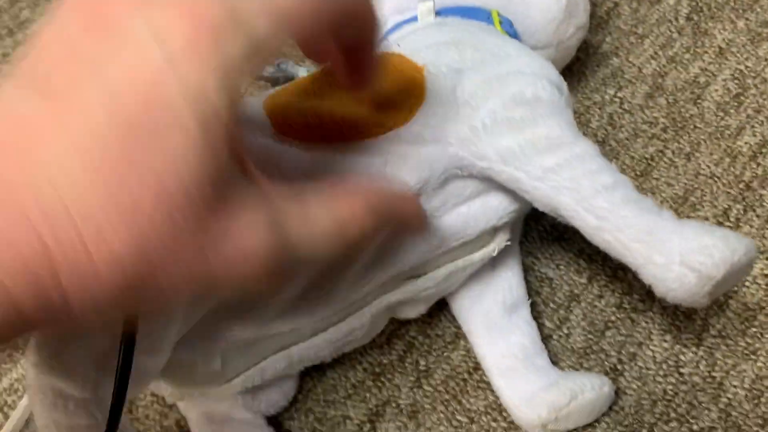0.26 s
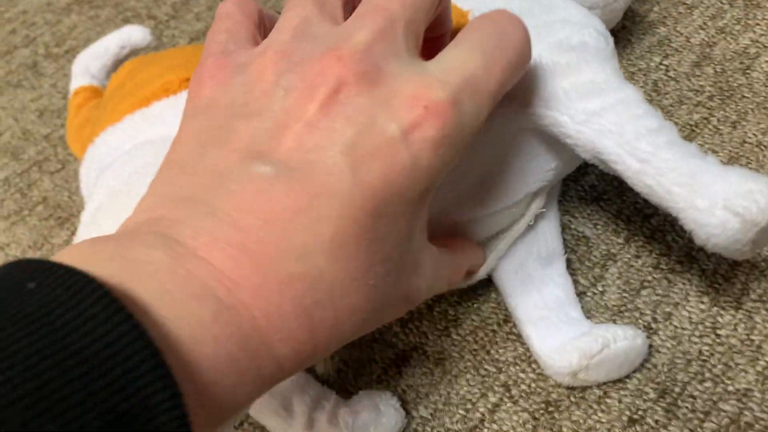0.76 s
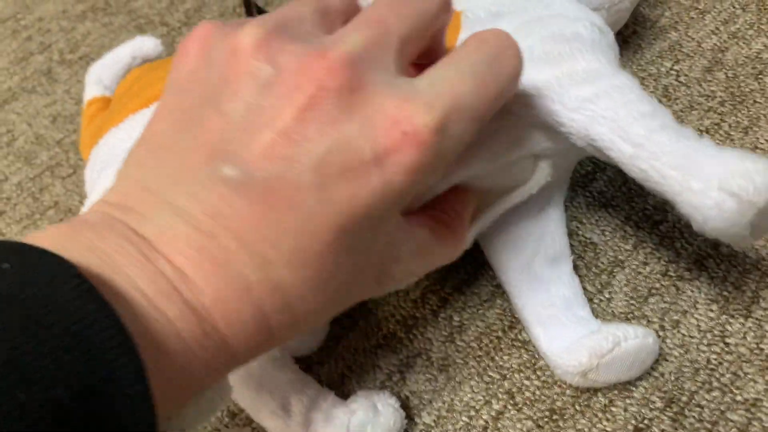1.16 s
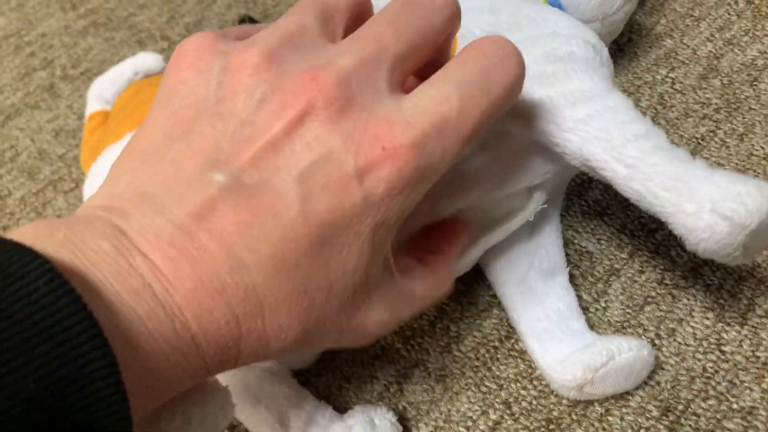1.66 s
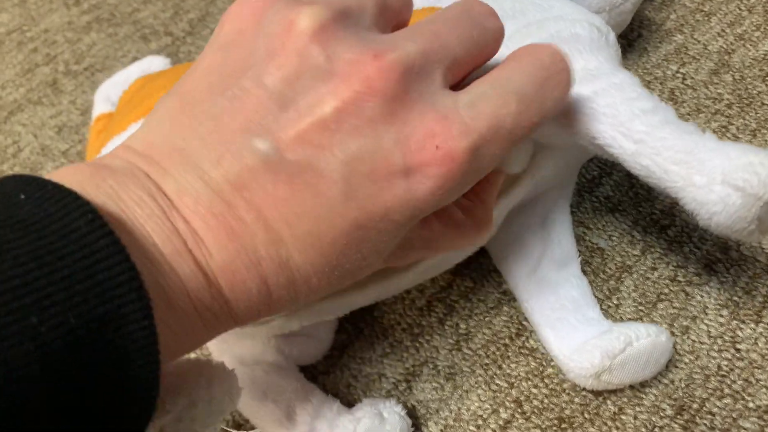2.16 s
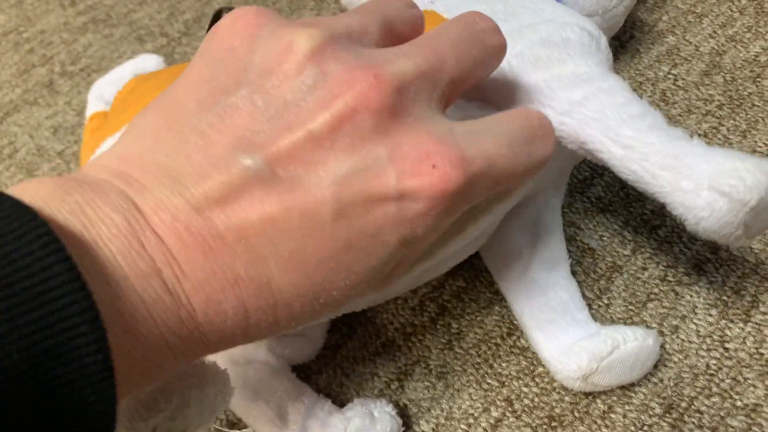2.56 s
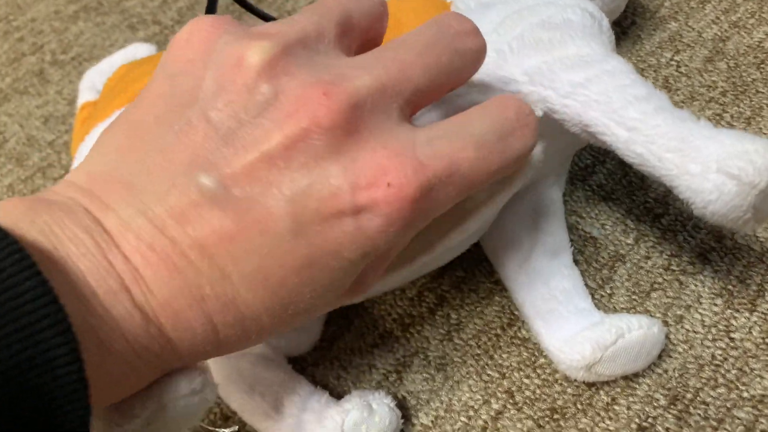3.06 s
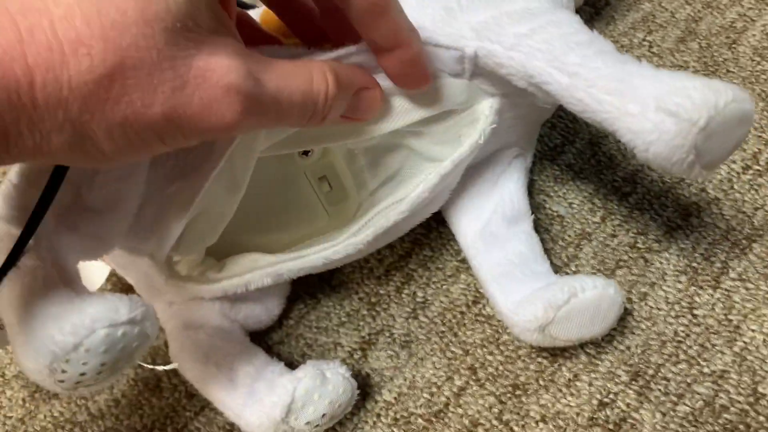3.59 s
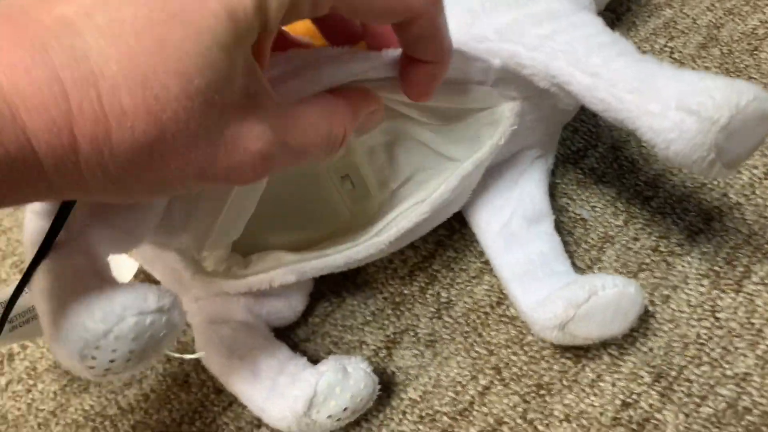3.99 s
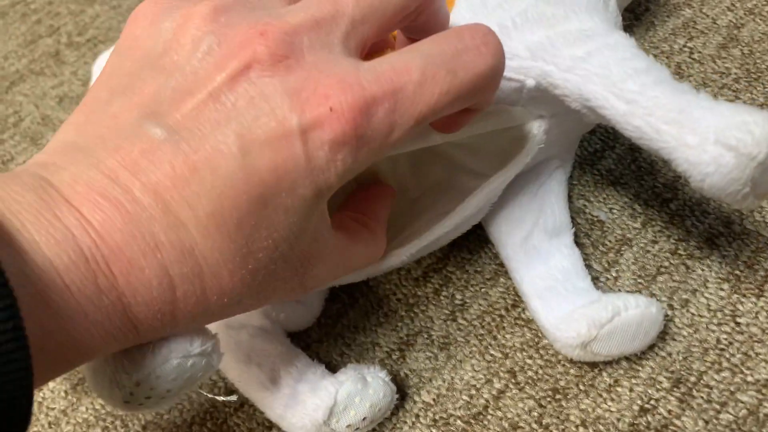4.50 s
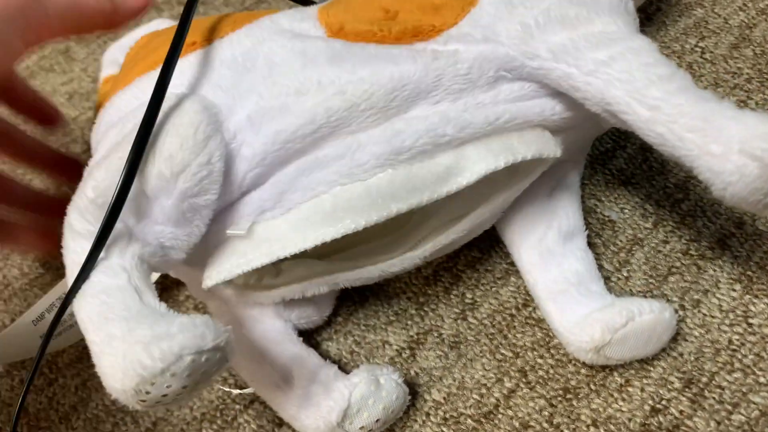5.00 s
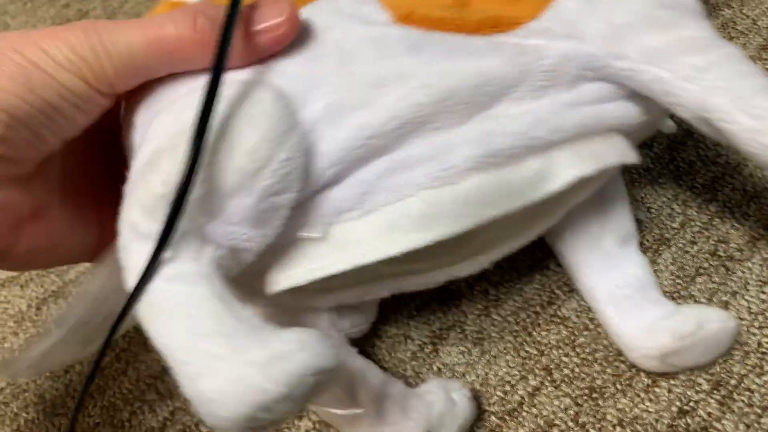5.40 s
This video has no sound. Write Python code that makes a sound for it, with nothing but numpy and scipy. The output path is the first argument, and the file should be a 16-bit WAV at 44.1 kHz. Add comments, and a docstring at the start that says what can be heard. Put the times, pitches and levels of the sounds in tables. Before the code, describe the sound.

Close, dry tearing of a fabric fastener in two pulls, the second weaker and more broken, followed by quiet plush brushing and faint clicks indoors.

```python
"""First a low rumble with a faint hum and soft brushing, then a hook-and-loop strip rips open in two short pulls.
The strip is on a plush toy in a carpeted room; hooks snap as short noise bursts that ring the tape (damped
modes) and thud the stuffing, small hooks crackle; tearing loops and late soft scuffs are trains of random breaks.
Fingers brush the plush and the toy slides on the carpet as shaped noise; stiff tape squeaks as wandering sines.
Late soft ticks come from handling. A short diffuse tail follows hooks and tears; two ports hear it all."""
import sys
import numpy as np
from scipy import signal
from scipy.fft import rfft, irfft, next_fast_len
from scipy.io import wavfile
from scipy.ndimage import uniform_filter1d

SR = 44100
rng = np.random.default_rng(int(sys.argv[2]) if len(sys.argv) > 2 else 0)


def file_out(sig):
    """Save sig as 16-bit WAV at sys.argv[1]."""
    # one column per channel
    cols = np.atleast_2d(sig).T
    # limit, then scale
    lim = np.clip(cols, -1, 1)
    pcm = np.round(lim * 32767).astype(np.int16)
    wavfile.write(sys.argv[1], SR, pcm)


N = 249165  # length [samples]


def gain_of(db):
    """Level law: decibels to an amplitude factor."""
    return 10 ** (np.asarray(db) / 20)


def evened(x):
    """Power normalisation: scales to rms 1."""
    return x / np.sqrt(np.mean(x ** 2) + 1e-20)


def read(points, hz):
    """Logarithmic pitch axis: interpolates a curve over log frequency."""
    f, value = np.transpose(points)
    return np.interp(np.log(hz + 1), np.log(f + 1), value)


def causal(points, size=1024):
    """Minimum phase: the impulse that packs a spectrum's energy earliest, peak 1."""
    level_db = read(points, abs(np.fft.fftfreq(size, 1 / SR)))
    log_gain = np.log(gain_of(np.maximum(level_db, -100)))
    spectrum = np.exp(np.conj(signal.hilbert(log_gain)))
    taps = np.fft.ifft(spectrum).real[:size // 2]
    return taps / abs(taps).max()


def ring(modes, detune):
    """Modal decay: a sum of sines, each dying at a rate set by its bandwidth, peak 1."""
    t = np.arange(800) / SR
    out = 0
    for (hz, width_hz, db), shift in zip(modes, detune):
        decay = np.exp(-np.pi * width_hz * t)
        out = out + gain_of(db) * decay * np.sin(2 * np.pi * hz * shift * t)
    out *= 1 - np.exp(-t / .00015)  # each ring swells in over a fraction of a millisecond
    return out / abs(out).max()


def held(start, rise, hold, t60):
    """Exponential release: linear rise, hold, then decay by 60 dB per t60; times in s."""
    t = np.arange(N) / SR - start
    return np.clip(t / rise, 0, 1) * gain_of(-60 * np.maximum(t - rise - hold, 0) / t60)


# likeness of the noise at the two ports: (frequency [Hz], coherence [0 to 1])
PORT_COHERENCE = [(100, 0.98), (500, 0.62), (1500, 0.067), (4000, 0.087), (6000, 0.077), (7000, 1),
                  (16000, 0.85)]


def port_noise(points, grain):
    """Partial coherence: coloured noise at two ports sharing an envelope, rms 1 over both."""
    size = next_fast_len(N)
    hz = np.fft.rfftfreq(size, 1 / SR)
    first, other = rfft(rng.standard_normal((2, N)) * grain, size)
    same = np.clip(read(PORT_COHERENCE, hz), 0, 1)
    second = same * first + np.sqrt(1 - same ** 2) * other
    coloured = np.array([first, second]) * gain_of(read(points, hz))
    return evened(irfft(coloured, size)[:, :N])


# relative spectrum of the low rumble: (frequency [Hz], level [dB])
RUMBLE_SPECTRUM = [(12, -58), (25, -36.5), (34, -19.5), (50, -6), (58, -5), (66, 7), (76, -6), (100, -7),
                   (140, -10), (200, -25), (476, -37), (900, -47.5), (1200, -63), (2000, -120)]
# level of the rumble, rising and falling: (time [s], level [dB])
RUMBLE_LEVEL = [(0.0, -57), (0.93, -50.5), (0.96, -59), (2.01, -57), (2.11, -46.5), (2.2, -64),
                (2.26, -46.5), (2.42, -60.5), (3.07, -54), (3.16, -59.5), (3.78, -55.5), (3.96, -62),
                (4.04, -52), (4.11, -57.5), (5.6, -54.5), (5.65, -47.5)]
# relative spectrum of the steady hiss: (frequency [Hz], level [dB])
HISS_SPECTRUM = [(600, -23), (1200, 4.5), (4000, -1.5), (9000, -3.5), (15500, -4), (16000, -40.5)]
HISS_DB = -83.5
# faint hum lines: (frequency [Hz], rms level [dB])
HUM_LINES = [(360, -88), (479, -88), (598, -79)]


def room_tone(waver=0.013):
    """Noise floor: narrow-band rumble of wandering level, steady hiss and frequency-modulated hum lines."""
    t = np.arange(N) / SR
    rumble_gain = gain_of(np.interp(t, *np.transpose(RUMBLE_LEVEL)))
    out = rumble_gain * port_noise(RUMBLE_SPECTRUM, 1)
    out += gain_of(HISS_DB) * port_noise(HISS_SPECTRUM, 1)
    for hz, db in HUM_LINES:
        drift = 1 + waver * evened(uniform_filter1d(rng.standard_normal(N), 3000))
        phase = 2 * np.pi * np.cumsum(hz * drift) / SR
        out = out + gain_of(db) * np.sqrt(2) * np.sin(phase)
    return out


# relative spectrum of the toy's flank on the carpet: (frequency [Hz], level [dB])
DRAG_SPECTRUM = [(150, -40.5), (250, -13.5), (443, -9), (649, -2), (1360, -23.5), (1640, -14), (2240, -6),
                 (3290, -17.5), (4440, -12), (4820, -26), (6500, -29), (8450, -60), (14300, -120)]
# slides of the toy: (start [s], hold [s], level [dB])
SLIDES = [(5.079, 0.072, -59), (5.22, 0.084, -77.5)]
SLIDE_RISE_S, SLIDE_T60_S = 0.05, 0.36


def sliding(grain_db=2.0):
    """Friction noise: rough hiss with the hollow colour of the stuffed body."""
    grain = gain_of(grain_db * evened(uniform_filter1d(rng.standard_normal(N), 150)))
    hiss = port_noise(DRAG_SPECTRUM, grain)
    level = sum(gain_of(db) * held(s, SLIDE_RISE_S, hold, SLIDE_T60_S) for s, hold, db in SLIDES)
    return hiss * level


# relative spectra of the three brushing bands: (frequency [Hz], level [dB])
FIZZ_SPECTRUM = [(5000, -30), (6500, -6), (8700, 0), (10500, -5), (12500, -8), (15700, -11), (16000, -45)]
SWISH_SPECTRUM = [(1200, -12.5), (1900, -7), (2700, -2), (3600, -7), (4400, -3.5), (5300, -10.5),
                  (6200, -14), (7000, -39.5)]
PRESS_SPECTRUM = [(150, -22), (280, -4.5), (600, -3.5), (1200, -10.5), (2000, -19.5)]
# finger strokes, levels before the band trims of fingers():
# (peak time [s], rise [s], fall [s], fizz [dB], swish [dB], press [dB])
STROKES = [(0.1, .1, 0.35, -77.5, -82, -80), (0.46, 0.13, 0.13, -71.5, -72.5, -71),
           (0.645, 0.029, 0.24, -56, -63, -80), (0.72, 0.14, 0.5, -59.5, -72, -65.5),
           (0.795, 0.052, 0.097, -58, -45.5, -68), (0.881, 0.069, .07, -73, -51.5, -76),
           (0.93, 0.079, 0.066, -59, -84, -66), (1.1, 0.3, 0.054, -60, -62, -63.5),
           (1.15, 0.078, 0.084, -54.5, -58, -80), (1.26, 0.048, 0.11, -66.5, -57.5, -51.5),
           (1.62, 0.28, 0.059, -73.5, -80.5, -87), (1.72, 0.045, 0.089, -66, -66, -76),
           (1.88, 0.16, 0.12, -55.5, -70, -92), (2.04, 0.15, 0.29, -58.5, -61, -65),
           (2.244, 0.02, 0.054, -46, -48.5, -80.5), (2.46, 0.22, 0.074, -74.5, -78.5, -79),
           (2.645, .08, 0.075, -64.5, -71, -64), (2.9, 0.085, 0.37, -70, -76, -76),
           (3.19, 0.13, 0.23, -75.5, -80, -77), (3.43, 0.1, 0.076, -68, -65, -71),
           (3.82, 0.14, 0.1, -60, -67, -64.5), (3.86, 0.066, 0.04, -62, -72, -78),
           (4.009, 0.11, 0.12, -79, -71.5, -76.5), (4.21, .1, 0.052, -84, -75, -75.5),
           (4.41, 0.046, 0.061, -58, -64.5, -59.5), (4.65, 0.023, 0.059, -61.5, -71.5, -83.5),
           (4.69, 0.046, .04, -54.5, -62, -65), (4.74, 0.052, 0.029, -59.5, -62, -79.5),
           (5.16, 0.07, 0.096, -82, -67.5, -56.5), (5.279, .1, 0.13, -66, -64.5, -75.5),
           (5.391, 0.26, 0.14, -63.5, -67.5, -65.5), (5.499, 0.1, 0.076, -61, -61, -60.5),
           (5.64, 0.26, 0.085, -68, -67, -68)]
FADE_DB = -20.5  # change of level over one rise or fall time away from the peak
RESTING_DB = (-90, -96, -82.5)  # the hand lying still, before the trims: fizz, swish, press


def brushing(t):
    """Energy summation: band gains from strokes that swell to a peak and fade, added as powers."""
    power = gain_of(RESTING_DB)[:, None] ** 2 * np.ones(len(t))
    for s, rise, fall, *levels_db in STROKES:
        away = np.where(t < s, (s - t) / max(rise, .01), (t - s) / max(fall, .01))
        power = power + (gain_of(levels_db)[:, None] * gain_of(FADE_DB * away)) ** 2
    return np.sqrt(power)


def fingers(patchy_db=2.0, fibre_db=-0.5, colour_db=3.5, fizz_db=-1.5, swish_db=-1.0, press_db=-0.5):
    """Friction on pile: skin sliding gives three bands of uneven hiss whose colour wanders."""
    grain = gain_of(patchy_db * evened(uniform_filter1d(rng.standard_normal(N), 400)))
    flicks = uniform_filter1d(rng.exponential(1, N) ** 2, 40) - 2
    grain *= gain_of(fibre_db * evened(flicks))  # negative: each burst of fibre flicks dips the level
    t, steps = np.arange(N) / SR, np.arange(0, N, 64) / SR
    spectra = (FIZZ_SPECTRUM, SWISH_SPECTRUM, PRESS_SPECTRUM)
    hiss = 0
    for spectrum, gain, trim_db in zip(spectra, brushing(steps), (fizz_db, swish_db, press_db)):
        hiss = hiss + np.interp(t, steps, gain) * gain_of(trim_db) * port_noise(spectrum, grain)
    z = signal.stft(hiss, nperseg=256)[2]
    patches = rng.standard_normal(z.shape[1:])
    patches = uniform_filter1d(uniform_filter1d(patches, 4, 0), 24, 1)  # smooth over pitch, then time
    return signal.istft(z * gain_of(colour_db * evened(patches)), nperseg=256)[1][:, :N]


# faint squeaks of stiff tape, level before the envelope:
# (start [s], hold [s], frequency [Hz], bandwidth of each of two equal poles [Hz], level [dB])
SQUEAKS = [(0.92, 0.17, 2860, 130, -74), (4.204, .012, 3090, 120.7, -72), (4.204, .008, 1024, 200, -65.5),
           (4.407, .008, 4820, 403, -44.5)]
SQUEAK_T60_S = .04


def squeaks():
    """Narrow-band noise: rubbing tape as a sine whose size and phase wander as its bandwidth allows."""
    out, t = np.zeros(N), np.arange(N) / SR
    for s, hold, hz, width, db in SQUEAKS:
        r = np.exp(-np.pi * width / SR)
        noise = rng.standard_normal(N) + 1j * rng.standard_normal(N)
        wander = signal.lfilter([1], [1, -2 * r, r * r], noise)
        tone = evened((wander * np.exp(2j * np.pi * hz * t)).real)
        out += gain_of(db) * held(s, 0.0014, hold, SQUEAK_T60_S) * tone
    return out


# relative spectrum of one snap, for tears and hooks: (frequency [Hz], level [dB])
SNAP_SPECTRUM = [(800, -52.5), (2000, -38), (4000, -23.5), (6000, -6), (8500, 5), (11000, 0.5), (15000, 2),
                 (16000, -7.5), (17000, -27)]
# modes of the stiff tape, for tears and hooks: (frequency [Hz], bandwidth [Hz], level [dB])
TAPE_MODES = [(1540, 1000, 6), (2257, 770, -1), (3450, 900, -2), (4410, 990, -0.5), (5237, 3600, -12)]
# clumps of loops tearing in one go, and after 3 s short soft scuffs of handling;
# each is cut off after 3000 samples of breaks:
# (start [s], length [s], level [dB], tape ring over it [dB], mean break rate [1/s])
TEARS = [(0.77, 0.0027, -46, -13, 5400), (0.784, 0.004, -39, -1, 3600), (0.889, 0.0055, -30.5, -2.5, 4600),
         (1.045, 0.017, -26.5, -14.5, 13800), (1.235, 0.094, -41.5, -10.5, 1700),
         (2.092, 0.026, -43, 9, 4600), (3.766, 0.032, -45.5, -12, 1200), (4.203, 0.013, -70.5, -9, 5800),
         (4.394, 0.0051, -61, 16, 5600), (4.681, 0.0046, -64.5, 0, 7300), (4.74, 0.02, -70.5, 7, 4300),
         (2.243, 0.004, -53, 21.5, 10000), (5.47, 0.019, -91, 16.5, 1300)]


def tears(spread_db=2.5):
    """Random impulse train: small fibres breaking in a clump of loops; late soft scuffs share the formula."""
    out = np.zeros(N + 4000)
    snap, tape = causal(SNAP_SPECTRUM), np.diff(ring(TAPE_MODES, np.ones(5)))
    snap, tape = snap / np.linalg.norm(snap), tape / np.linalg.norm(tape)
    t = np.arange(3000) / SR
    for (s, length, db, tape_db, per_s), z in zip(TEARS, rng.random((len(TEARS), 3, 3000))):
        sizes = gain_of(-spread_db * np.log(z[0] + 0.027))
        breaks = evened(sizes * (z[1] < per_s / SR) * np.sign(z[2] - .5))
        breaks = breaks * np.sin(np.pi * np.clip(t / length, 0, 1)) ** .5
        tape_ring = gain_of(tape_db) * np.convolve(breaks, tape)[:3500]
        sound = tape_ring + np.convolve(breaks, snap)[:3500]
        out[round(s * SR):][:3500] += gain_of(db) * sound
    return out[:N]


# small hooks letting go at random while the strip is under tension; level before its random spread,
# ring before the trim of hooks(): (start [s], end [s], snap rate [1/s], level [dB], tape ring over it [dB])
CRACKLE = [(0.661, 0.77, 94, -41.5, -7.5), (0.79, 0.953, 90, -38.5, -9.5), (1.014, 1.035, 110, -33.5, -4),
           (1.135, 1.17, 90, -36.5, -12.5), (1.24, 1.316, 130, -36.5, -10), (1.718, 1.73, 300, -41, -23),
           (1.819, 1.905, 75, -39.5, -13), (1.931, 2.035, 80, -37.5, -21), (2.057, 2.13, 100, -39, -0.5),
           (2.91, 2.949, 340, -41, -17.5)]
SMALL_DB, SMALL_BRIGHT_DB = 5, 3  # random spreads: level [dB], brightness [dB per octave]
SMALL_TAPE_HZ, SMALL_THUD_HZ = 3687, 526  # median frequencies
SMALL_THUD_DB = -30  # over the snap


def crackle():
    """Stratified random timing: one small hook in each slot, size and colour by chance, as SNAPS rows."""
    rows = []
    for start, end, per_s, db, tape_db in CRACKLE:
        slots = np.arange(start, end - .5 / per_s, 1 / per_s)
        for s, place, z in zip(slots, rng.random(40), rng.standard_normal((40, 4))):
            tape_hz = SMALL_TAPE_HZ * np.exp(.13 * z[2])
            thud_hz = SMALL_THUD_HZ * np.exp(.4 * z[3])
            rows.append((s + place / per_s, db + SMALL_DB * z[0], SMALL_BRIGHT_DB * z[1], tape_db,
                         tape_hz, SMALL_THUD_DB, thud_hz))
    return rows


# hooks snapping free, later also small handling ticks; ring before the trim of hooks():
# (time [s], snap peak [dB], brightness above 6 kHz [dB per octave], tape ring over the snap [dB],
#  tape ring centre [Hz], stuffed body thud over the snap [dB], thud [Hz])
SNAPS = [(0.4549, -34, 6, -3, 3460, -24.5, 1000), (0.6383, -17, 8, -25.5, 3320, -55, 420),
         (0.6607, -3.5, 2.5, -22.5, 3460, -29.5, 558), (0.6993, -26, 4.5, -25.5, 4100, -41, 538),
         (0.7324, -2, 12.5, -17.5, 4130, -30, 662), (0.773, 0, -1.5, -17, 4900, -44, 725),
         (0.7804, -1, -3, -19.5, 4800, -39.5, 1690), (0.784, 2, 6.5, -14.5, 3070, -35.5, 1570),
         (0.8132, -7.5, -1, -8.5, 3590, -39.5, 1036), (0.8195, -2.5, -4.5, -13.5, 4900, -33, 1010),
         (0.8478, -36, 10.5, -24, 3210, -48, 549), (0.859, -12, 5, -15, 2980, -35, 1000),
         (0.8835, -2, 2.5, -16, 3600, -39, 620), (0.8893, -6, 4, -15, 3280, -33, 256),
         (1.0231, -13, 5, -43, 4500, -58, 610), (1.0394, -18.5, 16, -5.5, 4600, -32, 720),
         (1.0439, -17.5, 9, -22, 3900, -36, 1120), (1.0459, -23, 8, -19, 4500, -36, 1110),
         (1.0546, -4, 29.5, -12, 4330, -37, 636), (1.1449, -25, 5, -9, 2680, -41, 603),
         (1.176, -33, 11, -24, 4680, -34.5, 244), (1.2119, -39.5, -9.5, -12, 3770, -30, 1380),
         (1.2375, -3, 13.5, -26, 4000, -64, 870), (1.2465, -15.5, 19, -14, 3600, -23, 710),
         (1.2616, -19, 4.5, -11, 4200, -57, 334), (1.2738, -29, -1, -4, 2500, -36, 520),
         (1.294, 1.5, 8, -15.5, 3500, -42, 1496), (1.606, -67, 3, 14, 3230, -10, 605),
         (1.6933, -45.5, 5, -10, 3900, -25, 289), (1.7032, -37.5, 10, -4.5, 3000, -30, 990),
         (1.7443, -41, 3, -11, 3730, -30, 536), (1.8102, -39, 5, -8, 4100, -21.5, 650),
         (1.8564, -21.5, -6, -20, 4600, -64, 370), (1.8791, -28.5, 0, -17, 4020, -47, 600),
         (1.89, -27, 3.5, -14.5, 3100, -50, 322), (1.9011, -38, 13, -21, 3200, -21, 1060),
         (1.9474, -23, 4.5, -25.5, 4200, -43, 575), (1.9875, -5.5, 2, -23, 3180, -39.5, 563),
         (2.052, -12.5, -4.5, -4, 4000, -29, 1143), (2.0553, -16.5, -8, -1, 3800, -32.5, 483),
         (2.0849, -15.5, -9, 3.5, 3980, -27, 960), (2.0981, -19.5, -27.5, -10.5, 3430, -24.5, 1073),
         (2.1043, -16.5, -2, 1, 2980, -13.5, 1200), (2.1074, -26.5, 15, -15.5, 3170, -22, 1320),
         (2.1119, -26, 9.5, -32, 3300, -16, 1327), (2.1439, -32.5, 11, -12, 4048, -24.5, 580),
         (2.2166, -35, 8.5, 2, 3890, -38.5, 1200), (2.2227, -22, 9, 6, 4100, -21, 1300),
         (2.2433, -9.5, 0.5, -6.5, 4400, -14.5, 1124), (2.2455, -31, -2, 0, 2278, 1.5, 750),
         (2.9291, -29.5, 1.5, -15, 3960, -50, 597), (2.9397, -31.5, -2, -20, 3646, -38, 604),
         (3.153, -55.5, -6, -3, 3183, 2, 1050), (3.438, -61, -4.5, 11, 3900, 10.5, 282),
         (3.784, -23, -16, -33, 4830, -29.5, 556.5), (3.7884, -16, -6.5, -25.5, 4716, -43, 319.8),
         (4.207, -64, -1.5, 16, 2730, 9, 860), (4.3393, -21.5, 3.5, -12, 4190, -29.5, 1507),
         (4.3926, -12.5, 12.5, -13, 4700, -24.5, 1550), (4.4074, -45, -2, 2.5, 4650, -28, 362),
         (4.489, -76, -9, 5, 1512, 15, 897), (4.7403, -45.5, -5.5, -21, 3093, -22.5, 550.4),
         (5.3734, -36.5, -2, -29, 3764, -20, 614), (5.416, -57, -6, 10.5, 1940, 6, 418),
         (5.4975, -46.5, 12, 13, 1950, 4, 670), (5.581, -38, -7.5, -14, 4200, -21, 286),
         (5.6005, -55, -2, -17, 3100, -21, 577)]
SLIP_MS, SLIP_SPREAD = .22, 0.31  # median time scale of letting go, its log spread
HANDLING_FROM_S, TICK_SLIP_MS = 3.0, 0.66  # strip open: soft handling slips longer (before the 0.6 ms limit)
TAPE_DETUNE = .05  # each snap finds the tape modes shifted a little


def hooks(tape_db=-4.5, scatter_db=-12.0, floor_db=-2.5, focus_db=16.0, thud_width=0.13):
    """Impulsive excitation: each hook's quick slips click, ring the tape and thud the stuffing."""
    out, t = np.zeros((2, N + 2000)), np.arange(200) / SR
    rows = SNAPS + crackle()
    draws = rng.standard_normal((200, 640))
    for (s, db, bright, tape, tape_hz, thud, thud_hz), z in zip(rows, draws):
        slip_ms = (SLIP_MS if s < HANDLING_FROM_S else TICK_SLIP_MS) * np.exp(SLIP_SPREAD * z[600])
        u = t / (np.clip(slip_ms, .05, .6) * 1e-3)
        slips = z[:200] * u ** 2 * np.exp(-1.6 * u)  # the slips build up, then die out
        colour = [(f, g + bright * np.log2(max(f, 6000) / 9000)) for f, g in SNAP_SPECTRUM]
        click = np.convolve(slips, causal(colour))
        jerk = abs(slips) ** 3  # the largest slips jerk the tape
        # the place of the hook picks the modes: focus_db is lost per octave from the centre
        struck = [(f, w, g - focus_db * abs(np.log2(f / tape_hz))) for f, w, g in TAPE_MODES]
        tape_ring = np.diff(np.convolve(jerk, ring(struck, 1 + TAPE_DETUNE * z[601:])))
        stuffing = [(thud_hz, thud_width * thud_hz, 0), (thud_hz / 2.2, 120, -5)]
        sound = gain_of(thud) * ring(stuffing, [1, 1]) * np.ones((2, 1))
        sound[:, :len(click)] += click / abs(click).max()
        for port in range(2):  # the hand scatters the ring differently to each port
            scatter = z[200 + 200 * port:400 + 200 * port]
            bounce = gain_of(scatter_db) * scatter * np.exp(-t / .0006)
            bounce[97] += gain_of(floor_db)  # one bounce off the floor, 2.2 ms late
            heard = tape_ring[:800] + np.convolve(tape_ring, bounce)[:800]
            sound[port] += gain_of(tape + tape_db) * heard / abs(tape_ring).max()
        at = round((s - 1.25 * slip_ms * 1e-3) * SR)  # start early, by the slips' build-up
        out[:, at:at + 800] += gain_of(db) * sound
    return out[:, :N]


# decay of the room tail: (frequency [Hz], t60 [s])
ROOM_T60 = [(300, 0.12), (1500, 0.16), (4000, 0.15), (9000, 0.028), (16000, 0.03)]
# relative colour of the tail, strongest near 4 kHz and darker above: (frequency [Hz], level [dB])
TAIL_COLOUR = [(300, -3.5), (1500, -4), (4000, 3), (7000, 0), (10000, -5), (16000, -9)]


def room(x, near_db=-18.0, far_db=-21.0, near_t60=.009):
    """Diffuse reverberation: quick scatter off hand and carpet, then noise whose bands decay separately."""
    tail = port_noise([(20, 0.001), (20000, 0.015)], 1)[:, :SR // 2]
    hz, t, z = signal.stft(tail, SR, nperseg=256)
    decay_db = read(TAIL_COLOUR, hz)[:, None] - 60 * t / read(ROOM_T60, hz)[:, None]
    far = signal.istft(z * gain_of(decay_db), SR, nperseg=256)[1][:, :SR // 2]
    t = np.arange(SR // 2) / SR
    far *= np.clip((t - .002) / 0.0031, 0, 1)
    near = tail[:, ::-1] * gain_of(-60 * t / near_t60) * (t > .0004)
    taps = gain_of(far_db) * far / np.linalg.norm(far[0])
    taps = taps + gain_of(near_db) * near / np.linalg.norm(near[0])
    return signal.oaconvolve(x.mean(0)[None], taps, axes=1)[:, :N]


def scene():
    """Superposition: hooks and tears with their room, over brushing, sliding, squeaks and room tone."""
    rip = hooks() + tears()
    return rip + room(rip) + fingers() + sliding() + squeaks() + room_tone()


# level difference of the ports: (frequency [Hz], left over right [dB])
PORT_TILT = [(60, 1.5), (99, 0), (160, 1), (270, 0.5), (450, -2.5), (740, -2), (1220, 1), (2010, -2.5),
             (3330, 1), (5500, -4.5), (9080, 1), (15000, -0.5)]
SPLIT_HZ, LEFT_LAG_S, RIGHT_LOW_LAG_S = 6000, 9 / 44100, 22 / 44100
EDGE_HZ = 16700  # upper band limit


def record(dry, ceiling=0.68):
    """Interaural-style cues: port lags, treble a quarter cycle apart, level tilt; soft overload, band limit."""
    size = next_fast_len(N + 4096)
    hz = np.fft.rfftfreq(size, 1 / SR)
    high = np.sin(np.pi / 2 * np.clip((hz - SPLIT_HZ) / 800 + .5, 0, 1)) ** 2
    left = (1 - high + 1j * high) * np.exp(-2j * np.pi * hz * LEFT_LAG_S)
    right = (1 - high) * np.exp(-2j * np.pi * hz * RIGHT_LOW_LAG_S) + high  # treble has no lag here
    half = gain_of(read(PORT_TILT, hz) / 2)
    ports = irfft(rfft(dry, size) * [half * left, right / half], size)[:, :N]
    ports = ceiling * np.tanh(ports / ceiling)
    lowpass = signal.firwin(255, EDGE_HZ, window=("kaiser", 10), fs=SR)
    return signal.oaconvolve(ports, lowpass[None], "same")


dry = scene()
out = record(dry)
file_out(out)
```